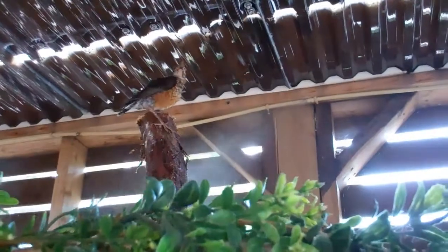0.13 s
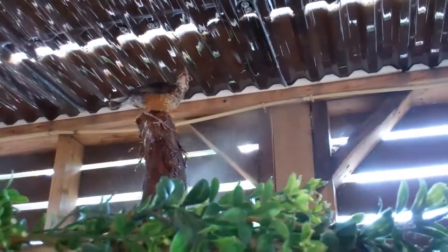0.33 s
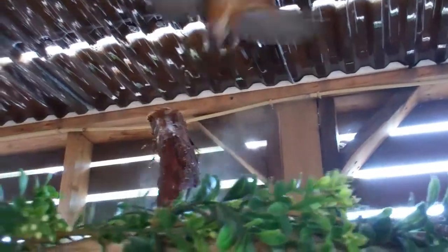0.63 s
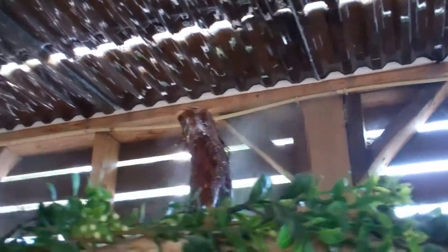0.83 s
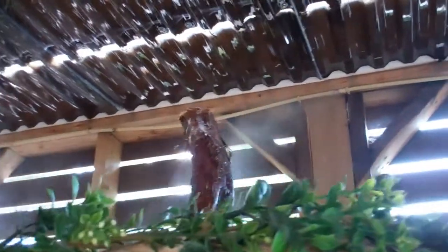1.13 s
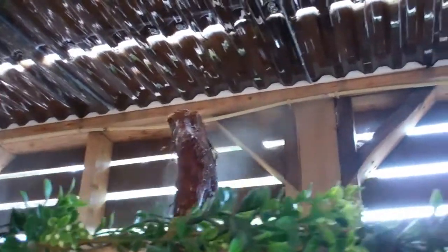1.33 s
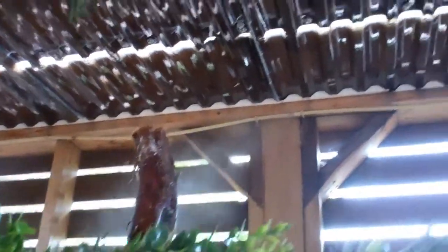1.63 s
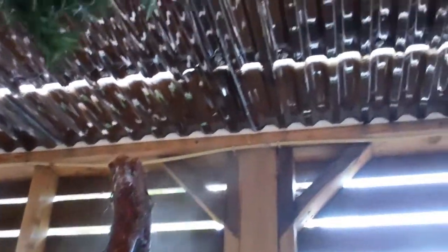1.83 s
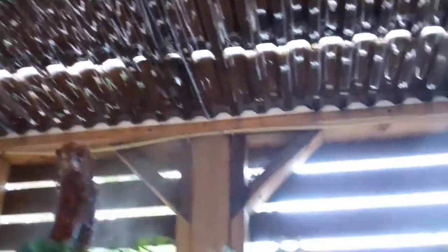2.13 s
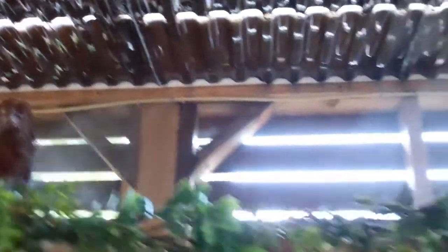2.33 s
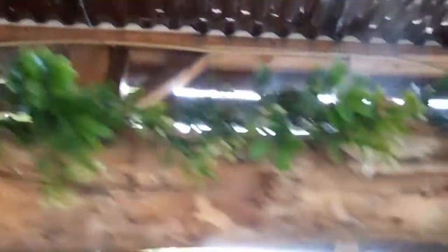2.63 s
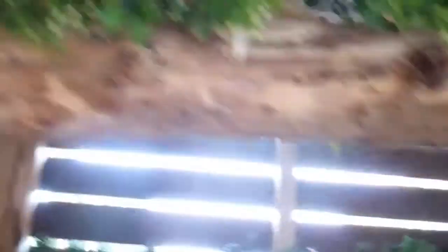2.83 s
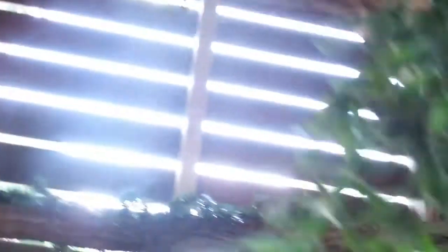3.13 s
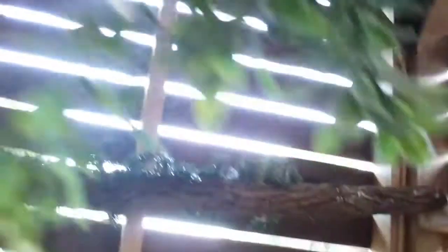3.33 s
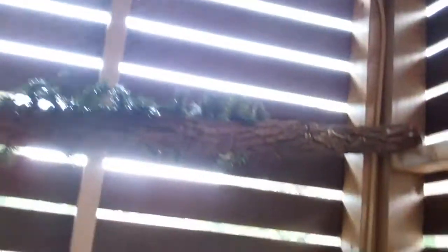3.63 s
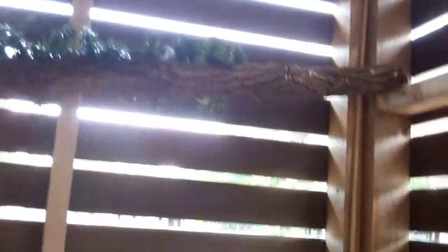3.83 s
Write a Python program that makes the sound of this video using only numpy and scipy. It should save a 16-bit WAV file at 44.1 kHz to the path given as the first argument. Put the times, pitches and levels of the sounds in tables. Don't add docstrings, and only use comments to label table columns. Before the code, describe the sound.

Close water-mist hiss with two sharp raspy bird chirps, faint wing claps and roof drips

```python
import sys
import numpy as np
from scipy import signal
from scipy.fft import rfft, irfft, next_fast_len
from scipy.io import wavfile
from scipy.ndimage import uniform_filter1d, map_coordinates

SR = 44100
rng = np.random.default_rng(int(sys.argv[2]) if len(sys.argv) > 2 else 0)


def ratio_of_db(decibels):
    return 10 ** (np.asarray(decibels, float) / 20)


def store_pcm(level_fs):
    pcm = np.round(np.clip(level_fs, -1, 1) * 32767).astype(np.int16)
    wavfile.write(sys.argv[1], SR, np.atleast_2d(pcm).T)


N = 176400
MIST_DB = -43


def unit(x):
    return x / np.sqrt(np.mean(x ** 2) + 1e-20)


def along(points, hz):
    f, v = np.transpose(points)
    return np.interp(np.log(hz + 1), np.log(f + 1), v)


def closed(points, hz):
    inside = (hz > points[0][0]) * (hz < points[-1][0])
    return ratio_of_db(along(points, hz)) * inside


def curves(rows, start=0):
    s, *cols = np.transpose(rows)
    t = np.arange(N) / SR - start
    return [np.interp(t, s, c) for c in cols]


def wobble(rate):
    knots = rng.standard_normal(int(N * rate / SR) + 4)
    return map_coordinates(knots, [np.arange(N) * rate / SR])


def tone(hz, shift=0):
    return np.sin(2 * np.pi * np.cumsum(hz) / SR + shift)


def filtered(x, response):
    m = next_fast_len(N + SR // 2)
    return irfft(rfft(x, m) * response(np.fft.rfftfreq(m, 1 / SR)), m)[..., :N]


def rush(spectrum, patchy_db):
    # pitch_hz, correlation (-1 to 1)
    alike = [(60, 0.86), (130, 0.99), (280, 0.93), (610, 0.87), (1330, 0.68), (2880, 0.38), (6250, 0.085),
             (13600, -0.22)]
    z = signal.stft(rng.standard_normal((2, N)), nperseg=512)[2]
    field = uniform_filter1d(rng.standard_normal(z.shape[1:]), 8, 0)
    field = unit(uniform_filter1d(field, 12, 1))
    pair = signal.istft(z * ratio_of_db(patchy_db * field), nperseg=512)[1][:, :N]

    def spread(hz):
        angle = np.arccos(np.clip(along(alike, hz), -1, 1)) / 2
        return closed(spectrum, hz) * [np.cos(angle), np.sin(angle)]

    mid, side = filtered(pair, spread)
    return unit(np.array([mid + side, mid - side]))


def gain_db():
    # time_s, mist_level_db
    ducking = [(0, -51), (.2, -45.5), (.42, -43), (.64, -42), (.675, -42.5), (.715, -55), (.9, -51),
               (1.1, -47.5), (1.39, -43.5), (1.71, -42), (1.99, -41.5), (2.025, -45), (2.065, -52),
               (2.16, -53.5), (2.35, -45), (2.65, -43), (4, -42.5)]
    return curves(ducking)[0] - MIST_DB


def mist():
    # pitch_hz, level_db
    # per Hz
    near_nozzle = [(1500, -17), (2500, -8.5), (3800, -6), (6500, -5.5), (8300, -0.5), (9300, -6),
                   (10500, -12.5), (14500, -30)]
    second_nozzle = [(2500, -22), (3400, -6), (3800, -2), (4400, -5), (5200, -4), (5800, 0), (6600, -6),
                     (8000, -22)]
    fizz_spectrum = [(9300, -5), (10300, 0), (12000, -11), (14500, -10)]
    yard_wash = [(100, -35), (170, -19), (195, -8.5), (382, -9), (610, -9.5), (1600, -13.5), (3500, -17.5),
                 (4550, -12), (7700, -120)]
    low_rumble = [(13, -27), (22, -29), (54, 3.5), (92, 4.5), (125, -1), (260, -10.5), (340, -31),
                  (570, -120)]
    # time_s, level_db
    nozzle_turn = [(0, -44), (2, -43), (3.2, -54.5), (4, -55)]
    # time_s, level_db
    yard_swell = [(0, -50.5), (1.5, -50), (2.5, -51), (3.1, -47.5), (4, -48)]
    hiss = ratio_of_db(MIST_DB + 1.29 + 0.74 * wobble(9.4)) * rush(near_nozzle, patchy_db=0.77)
    hiss = hiss + ratio_of_db(curves(nozzle_turn)[0]) * rush(second_nozzle, patchy_db=1.5)
    fizz = ratio_of_db(-66 + 3.1 * wobble(5.7)) * rush(fizz_spectrum, patchy_db=8.5)
    yard = ratio_of_db(curves(yard_swell)[0] + 1.7 * wobble(6.15)) * rush(yard_wash, patchy_db=1.05)
    rumble = ratio_of_db(-49.5 + 1.0 * wobble(2.78)) * rush(low_rumble, patchy_db=0.6)
    return hiss + fizz + yard + rumble


def engine():
    # time_s, cycle_rate_hz, pull (0-1)
    speed = [(0, 22.3, 0), (.35, 22.3, 0), (.6, 23.2, 0), (.9, 24.5, 0), (1.05, 23.6, 0), (1.2, 22.5, 0),
             (1.35, 21.1, 0), (1.5, 19.3, 0), (1.65, 18.2, 0), (1.95, 19.2, 0), (2.25, 20, 0),
             (2.42, 21.5, 1), (2.85, 23.1, 1), (3.15, 24.7, 1), (3.45, 25.8, 1), (4, 26.3, 1)]
    # time_s, level_db
    load = [(0, -62), (.38, -70), (.5, -45.5), (.9, -52.5), (1.3, -44), (1.65, -50), (1.95, -45),
            (2.4, -47.5), (2.85, -42), (3.15, -46.5), (3.5, -47), (4, -51.5)]
    # multiple of the cycle rate, level_db, change_under_pull_db
    orders = [(3, 1, 2), (4, 2, -14), (5, -2, 2), (6, -1, 7), (7, -7, -9), (8, -14, -1), (9, -5, -4),
              (10, -8, 8)]
    # pitch_hz, width_hz, level_db
    air_modes = [(75, 30, 0), (112, 28, -1), (148, 15, 3)]
    # time_s, pitch_hz, level_db
    run_up = [(2.85, 99, -65), (3.15, 102, -45), (3.45, 106.6, -40), (3.8, 108.8, -41), (4, 108.5, -40.5)]
    # ratio to its pitch, level_db
    pump_orders = [(0.999, 1.5), (1.369, -8), (1.82, -17), (2.02, -31)]
    (cycle_hz, pull), (level_db,) = curves(speed), curves(load)
    cycle_hz = uniform_filter1d(cycle_hz, size=4000)
    hum = 0
    for k, db, more_db in orders:
        hz = k * cycle_hz
        modes = 0.08 + sum(ratio_of_db(m_db) / (1 + (2 * (hz - mode_hz) / width) ** 4) for mode_hz, width, m_db in air_modes)
        swell = ratio_of_db(db + pull * more_db + 1.2 * wobble(4.14))
        hum = hum + swell * modes * tone(hz, 0.25 * wobble(5.72) + 2 * np.pi * rng.random())
    pump_hz, pump_db = curves(run_up)
    pump = sum(ratio_of_db(db) * tone(k * pump_hz, 0.65 * wobble(5.33)) for k, db in pump_orders)
    motor = np.sin(2 * np.pi * 220.6 * np.arange(N) / SR + 1.2 * wobble(3.85))
    return ratio_of_db(-66 + 4.2 * wobble(2.87)) * motor + ratio_of_db(level_db) * hum + ratio_of_db(pump_db) * pump


def drips():
    # start_s, peak_db as heard, pitch_hz
    drops = [(0.15, -38.5, 493), (0.704, -46, 490), (0.978, -46, 456), (1.252, -39, 460), (1.592, -34, 477),
             (1.799, -36, 476), (2.338, -38, 466), (2.431, -39, 520), (2.736, -38, 470),
             (2.788, -36.5, 520), (2.884, -32, 520), (2.924, -43, 544), (3.076, -45, 506),
             (3.187, -36.5, 500), (3.311, -40, 487), (3.411, -30.5, 502), (3.723, -50, 500),
             (3.835, -41, 500), (3.93, -35, 512)]
    # ratio to the pitch, level_db, t60_s
    sheet = [(1.0, -1.5, .038), (1.3, -5, .03), (2.25, -8, .025), (2.8, -9, .02)]
    out, t = np.zeros(N + SR), np.arange(SR // 5) / SR
    gain = gain_db()
    for s, db, hz in drops:
        first = round(s * SR)
        ring = 0
        for ratio, level, t60 in sheet:
            decay = ratio_of_db(level + rng.normal(0, 2.2) - 60 * t / t60)
            ring = ring + decay * np.sin(2 * np.pi * hz * ratio * t)
        onset = 1 - np.exp(-t / 0.0037)
        out[first:][:len(t)] += ratio_of_db(db + 5 - gain[first]) * ring * onset
    return out[:N]


def bird():
    # start_s, level_db, factor on the top pitch, rasp (0-1)
    calls = [
        (.638, -21, 1.0, 0.8),
        (1.986, -19, 0.955, 0.55),
    ]
    # time_s, upper_hz, lower_hz, level_db, lower_over_upper_db
    syrinx = [(-.03, 2950, 2300, -26, -30), (-.002, 3020, 2300, -14, -20), (.012, 3180, 2300, -6, -16),
              (.029, 3400, 2420, -4, -9), (.035, 3900, 2780, 0, -8), (.041, 4450, 3080, 2, -4),
              (.0485, 4900, 3400, -5, 2), (.0505, 4980, 3560, 8, -9), (.058, 5020, 3630, -3, -2),
              (.075, 4930, 3630, -13, -1), (.106, 4950, 3630, -22, 0)]
    # multiple of the flutter off the voice, level_db at full rasp
    sidebands = [(-1, -6), (1, -5), (2, 1), (3, -1), (4, -3)]
    # pitch_hz, level_db
    beak = [(1600, -26), (2250, -8), (3100, 0), (4400, 0), (5200, 1), (6200, -9), (9000, -15), (11000, -35)]
    out, t = np.zeros(N), np.arange(N) / SR
    for s, db, top, rasp in calls:
        since = t - s
        upper_hz, lower_hz, shape_db, lower_db = curves(syrinx, s)
        upper_hz = upper_hz * top ** np.clip(upper_hz / 1600 - 2, 0, 1)
        harsh = np.clip((0.034 - since) / 0.008, 0.22, 1)
        roughness = rasp * harsh
        echo = since > 0.056
        flutter = 2 * np.pi * np.cumsum(520 * (1 + 0.07 * wobble(250))) / SR

        def voice(hz, shift):
            uneven_db = np.where(echo, 4, 1 + 2.5 * harsh) * wobble(280)
            return tone(hz, shift + np.where(echo, 0.9, 0.5) * wobble(450)) * ratio_of_db(uneven_db)

        pair = (1 - 0.5 * roughness) * voice(upper_hz, 0) + ratio_of_db(lower_db) * voice(lower_hz, 0)
        beside = sum(ratio_of_db(side_db) * voice(upper_hz, k * flutter) for k, side_db in sidebands)
        breath = rng.standard_normal(N) * 2.3 * ratio_of_db(-5)
        sounding = abs(since - 0.039) < 0.069
        out += ratio_of_db(db + shape_db) * sounding * (pair + roughness * (beside + breath))
    return filtered(out, lambda hz: closed(beak, hz))


def squeaks():
    # centre_s, pitch_hz, level_db as heard, half_length_s
    chirps = [(.648, 5090, -25, .006), (.8675, 2000, -48, .005), (.9585, 2050, -44, .005),
              (.955, 3250, -42, .003), (.956, 5250, -41, .003), (.955, 7100, -41, .003),
              (1.274, 3250, -39, .006), (1.275, 2800, -43, .005), (1.314, 2700, -37, .006),
              (1.315, 3050, -41, .005), (1.316, 5000, -42, .003), (1.304, 4100, -43, .005),
              (3.495, 2100, -49, .015), (3.55, 1700, -49, .018)]
    t, uneven = np.arange(N) / SR, 1.1 * wobble(350)
    out = np.zeros(N)
    for s, hz, db, half in chirps:
        bell = np.exp(-((t - s) / half) ** 2)
        out += ratio_of_db(db - 2) * bell * np.sin(2 * np.pi * hz * t + uneven)
    return ratio_of_db(-gain_db()) * out


def wings():
    # start_s, peak_db as heard
    flaps = [
        (0.7535, -38.5),
        (0.865, -37.5),
        (0.9526, -32),
    ]
    # pitch_hz, level_db
    wing_air = [(300, -4), (900, -5), (1500, -11), (2000, -5), (2600, -9), (6000, -3), (10000, -12)]
    # time_s, level_db
    landing = [(1.255, -65), (1.266, -43), (1.274, -39), (1.283, -42.5), (1.305, -41), (1.315, -38),
               (1.325, -41.5), (1.342, -43), (1.355, -65)]
    # pitch_hz, level_db
    leaves = [(1150, -30), (1500, -1), (2100, -4), (2900, -1), (3500, -4), (5000, -10), (9000, -25)]
    t, gain = np.arange(N) / SR, gain_db()
    beat = np.zeros(N)
    for s, db in flaps:
        fall_db = 60 * np.clip(t - s, 0, 1) / 0.08
        onset = np.clip((t - s) / 0.00087, 0, 1)
        beat += ratio_of_db(db + 1.5 - 9 - gain[round(s * SR)] - fall_db) * onset
    claps = beat * unit(filtered(rng.standard_normal(N), lambda hz: closed(wing_air, hz)))
    crackle = rng.standard_normal(N) * ratio_of_db(3 * wobble(600))
    crackle = unit(filtered(crackle, lambda hz: closed(leaves, hz)))
    level_db, = curves(landing)
    return claps + ratio_of_db(level_db) * (level_db > -64) * crackle


def walls(x):
    # pitch_hz, t60_s
    decay = [(300, .2), (3000, .25), (10000, .15)]
    hz, t, z = signal.stft(rng.standard_normal((2, SR // 2)), SR, nperseg=256)
    fading = z * ratio_of_db(-60 * t / along(decay, hz)[:, None])
    tail = signal.istft(fading, SR, nperseg=256)[1]
    late = np.pad(x, (300, 0))[None]
    return signal.fftconvolve(late, tail / np.linalg.norm(tail[0]), axes=1)[:, :N]


def scene():
    call, small = bird(), wings() + drips() + squeaks()
    placed = np.array([call, 0.7 * np.roll(call, 3)])
    return mist() + engine() + placed + small + ratio_of_db(-10) * walls(call + small)


def band_limit(x):
    return signal.sosfilt(signal.butter(12, 14190, fs=SR, output="sos"), x)


def record(dry):
    # pitch_hz, left_over_right_db
    left_over_right = [(100, 4), (1200, 3), (3000, 4.5), (4500, 2.5), (5500, 6.5), (6800, 11.5),
                       (8300, 14.5), (11000, 1.5)]
    halves = np.array([[0.5], [-0.5]])
    ports = filtered(dry, lambda hz: ratio_of_db(along(left_over_right, hz) * halves))
    return band_limit(ports * ratio_of_db(gain_db()))


dry = scene()
out = record(dry)
store_pcm(out)
```